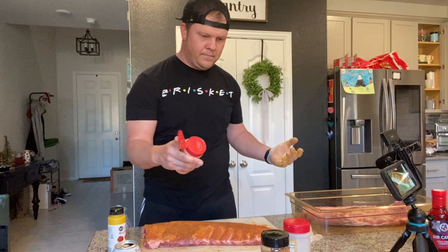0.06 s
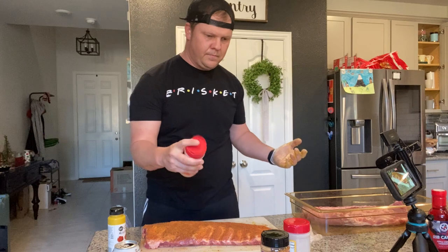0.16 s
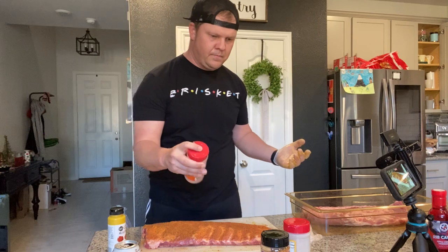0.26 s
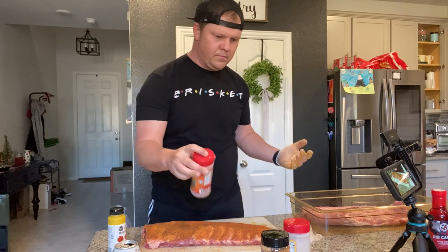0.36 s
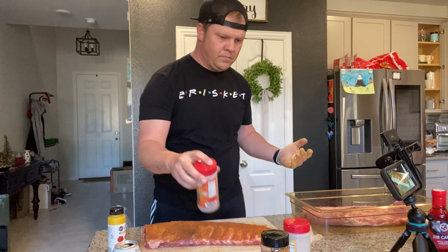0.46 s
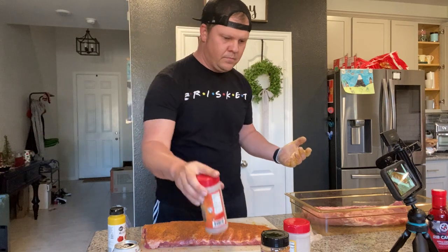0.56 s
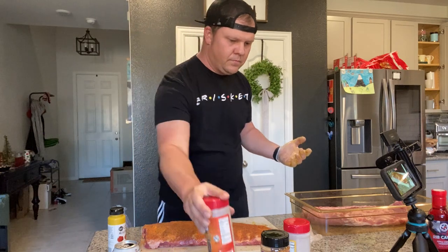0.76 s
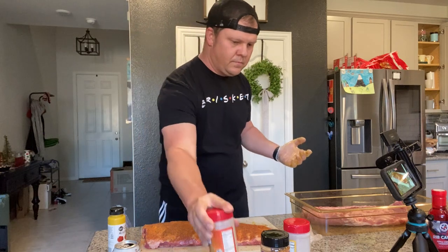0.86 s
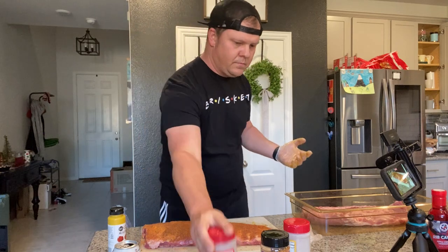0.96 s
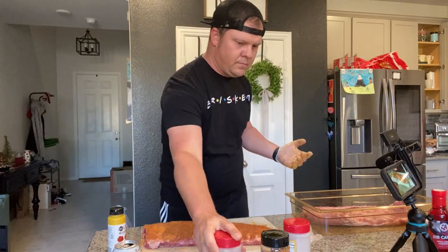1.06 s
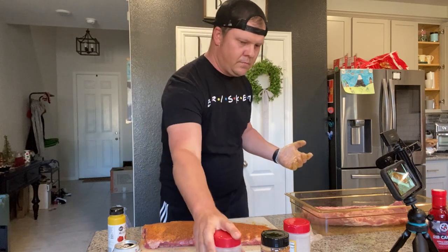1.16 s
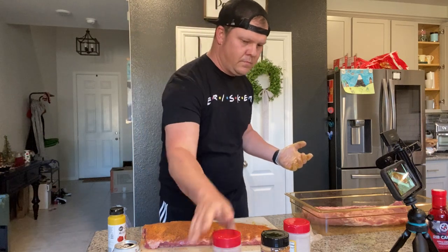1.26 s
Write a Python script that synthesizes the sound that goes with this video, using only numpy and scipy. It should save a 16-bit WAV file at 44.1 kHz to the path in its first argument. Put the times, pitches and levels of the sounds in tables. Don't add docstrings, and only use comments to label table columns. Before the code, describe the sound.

A plastic shaker lid snaps shut at about 0.2 seconds, a bright, tight click after a tiny creak. From 0.45 to 0.85 seconds the jar ticks in the hand, busiest after 0.65, with spice grains faintly sliding. At 1.02 it lands on a stone counter with a hard clack and small bounces. Short kitchen echoes, a steady low refrigerator hum and soft air; stereo phone pickup.

```python
import sys
import numpy as np
from scipy import signal
from scipy.fft import rfft, irfft, next_fast_len
from scipy.io import wavfile
from scipy.ndimage import uniform_filter1d

SR = 44100
rng = np.random.default_rng(int(sys.argv[2]) if len(sys.argv) > 2 else 0)


def boost_factor(decibels):
    exponent = np.asarray(decibels, float) / 20
    return 10 ** exponent


def inscribe(sig):
    pcm = np.round(np.clip(np.atleast_2d(sig).T, -1, 1) * 32767)
    wavfile.write(sys.argv[1], SR, pcm.astype(np.int16))


N = 57330


def evened(x):
    return x / np.sqrt(np.mean(x ** 2) + 1e-20)


def read(points, hz):
    f, value = np.transpose(points)
    return np.interp(np.log(hz + 1), np.log(f + 1), value)


def add(mix, start_s, sound):
    part = mix[round(start_s * SR):][:len(sound)]
    part += sound[:len(part)]


def late(x, samples):
    size = next_fast_len(N + 512)
    turn = np.exp(-2j * np.pi * np.fft.rfftfreq(size) * samples)
    return irfft(rfft(x, size) * turn, size)[:N]


def ring(modes, rise_s, phase):
    t = np.arange(SR // 2) / SR
    out = np.zeros(len(t))
    for (hz, db, t60), p in zip(modes, phase):
        out += boost_factor(db - 60 * t / t60) * np.sin(2 * np.pi * (hz * t + p))
    return (1 - np.exp(-t / rise_s)) * out


def blip(tones, width_s, phase):
    t = np.arange(round(14 * width_s * SR)) / SR
    u = t / width_s
    swell = u ** 2 / 4 * np.exp(2 - u)
    return swell * sum(boost_factor(db) * np.sin(2 * np.pi * (hz * t + p)) for (hz, db), p in zip(tones, phase))


def blows(rows, shell, rise_s, body_s, body, body_rise_s):
    out = np.zeros(N)
    shell_hz = np.transpose(shell)[0]
    for s, db in rows:
        phase = np.arange(len(shell)) / 2 + shell_hz * (s - rows[0][0])
        add(out, s, boost_factor(db - 11.5) * ring(shell, rise_s, phase))
    add(out, body_s, ring(body, body_rise_s, np.arange(len(body)) / 2))
    return out


def colour(x, points):
    log_gain = np.log(boost_factor(read(points, abs(np.fft.fftfreq(4096, 1 / SR)))))
    taps = np.fft.ifft(np.exp(np.conj(signal.hilbert(log_gain)))).real[:2048]
    return signal.fftconvolve(x, taps / np.linalg.norm(taps))[:N]


def cracks(rows, points):
    out, t = np.zeros(N), np.arange(400) / SR
    rise = np.minimum(t / 0.00053, 1)
    for (s, db), burst in zip(rows, rng.standard_normal((len(rows), 400))):
        add(out, s, boost_factor(db - 60 * t / 0.0077) * rise * burst)
    return colour(out, points)


def puffs(rows, points):
    out = np.zeros(N)
    for s, db in rows:
        add(out, s, boost_factor(np.array([db])))
    return colour(out, points)


# start in seconds, level in dB.
LATCH_SLIPS = [
    (.2172, -37),
    (.2184, -17.5),
    (.2194, -9.5),
    (.2202, -11),
    (.2210, -11.5),
    (.2218, -15.5),
    (.2236, -36),
    (.2265, -45),
]
# pitch in Hz, level in dB, time to fall 60 dB in seconds.
LID_MODES = [(870, -5, 0.01), (1170, 1, 0.012), (1400, -12, 0.0092), (1823, -5, 0.018), (2185, -8, 0.011),
             (2617, 0, 0.0058), (3000, -16, 0.0078), (3564, -0.5, 0.013), (4220, -1.5, 0.0051),
             (5090, 1, 0.0048), (5680, 3, 0.0041), (6450, -20, 0.0055), (9210, 9.5, 0.0061),
             (10630, 4, 0.0039)]
# pitch in Hz, level in dB, time to fall 60 dB in seconds.
JAR_MODES = [(125, -34.5, 0.11), (194, -19.5, 0.094), (272.8, -28, 0.15), (392, -26, 0.065),
             (514, -19.5, 0.033)]
# pitch in Hz, level in dB per Hz.
SNAP_CRACK = [(100, -20), (250, 3), (600, 2), (1300, -4), (2300, 2), (4200, -7), (10500, -3), (15000, -27)]


def lid_snap():
    snap = blows(LATCH_SLIPS, LID_MODES, 0.00033, .2215, JAR_MODES, 0.005)
    return snap + boost_factor(-4.5) * cracks(LATCH_SLIPS, SNAP_CRACK)


# pitch in Hz, level in dB.
LID_TAIL = [(100, -2.5), (1500, 0.5), (2200, 4.5), (3000, -3), (3600, 2.5), (4400, 0), (6000, 0.5),
            (15000, 0)]


def lid_puff():
    return boost_factor(18.5) * colour(puffs(LATCH_SLIPS[3:4], SNAP_CRACK), LID_TAIL)


def creak():
    out, t = np.zeros(N), np.arange(round(0.026 * SR)) / SR
    rub = rng.standard_normal(len(t))
    lid = ring(LID_MODES[:-3], 0.00018, rng.random(len(LID_MODES)))
    grit = np.convolve(rub, lid)[:len(t)]
    add(out, 0.2026, boost_factor(-58.5 + 960 * t) * evened(grit))
    return out


# start in seconds, knock level in dB, knock pitch in Hz,
# mid click level in dB, air click level in dB.
TICKS = [(0.446, -41, 1560, -35, -49.5), (0.585, -76, 1500, -45.5, -54.5), (.6580, -29, 1450, -25, -39),
         (.7250, -24, 1400, -34.5, -38.5), (0.7486, -63, 1500, -49, -56),
         (.7720, -15.5, 1516, -30.5, -41.5), (0.7996, -23.5, 1676, -21.5, -24),
         (.8560, -32.5, 1810, -53.5, -26.5), (1.005, -63, 1500, -49, -53), (1.237, -48, 1580, -73, -70),
         (0.6527, -37.5, 1470, -52, -70), (.5175, -77, 1500, -60.5, -72)]
# low push level in dB, push pitch in Hz, mid click centre in Hz,
# spread of the click from 0 to 1, crack level in dB.
TICK_BODY = [(-37.5, 367, 3770, 1, 0.5), (-41, 400, 3350, 0.19, 4), (-36, 290, 3660, 0.91, -0.5),
             (-38.5, 360, 3730, 1, 6), (-58, 110, 3600, 1, -2), (-33.5, 330, 4900, 0.9, 5),
             (-38.5, 270, 3330, 0.93, -3), (-64, 320, 4100, 1, 2.5), (-68, 310, 3150, 1, 8),
             (-45, 340, 4000, 1, 0), (-47, 840, 3400, 1, 0), (-75, 320, 5100, .15, -14)]
# pitch in Hz, level in dB.
AIR_TONES = [(7800, 6), (9200, 11.5), (11000, 4), (12500, -9), (14200, -20)]
# multiple of the centre pitch, level in dB.
CLICK_TONES = [(0.751, -0.5), (1.0, 2), (1.28, -4.5), (1.62, -2.5)]


def ticks():
    out, chance = np.zeros(N), rng.random((len(TICKS), 12))
    for tick, body, phase in zip(TICKS, TICK_BODY, chance):
        s, knock_db, knock_hz, click_db, air_db = tick
        push_db, push_hz, click_hz, spread, _ = body
        click = [((1 + spread * (k - 1)) * click_hz, db) for k, db in CLICK_TONES]
        click_s = 0.00025 / spread ** 0.72
        add(out, s + .0005, boost_factor(air_db - 3.5) * blip(AIR_TONES, 0.000087, phase))
        add(out, s + .0004, boost_factor(click_db - 3.5) * blip(click, click_s, phase[5:]))
        add(out, s + 0.00056, blip([(knock_hz, knock_db)], 0.00038, [0]))
        add(out, s + 0.00056, blip([(push_hz, push_db)], 0.00091, [0]))
    return out


def tick_edges():
    return [(s, .5 * (click_db + air_db) + body[-1])
            for (s, _, _, click_db, air_db), body in zip(TICKS, TICK_BODY)]


# start in seconds, pitch in Hz, level in dB, swell in seconds.
THUMPS = [
    (.2205, 334, -22.5, 0.0014),
    (.243, 253, -33, .004),
    (.28, 252, -40.5, 0.0073),
    (1.047, 219.5, -27, 0.0039),
    (1.058, 290, -33.5, 0.0071),
    (1.085, 116, -34, 0.005),
]


def thumps():
    out = np.zeros(N)
    for s, hz, db, swell_s in THUMPS:
        add(out, s, blip([(hz, db)], swell_s, [0]))
    return out


# time in seconds, level in dB.
SPICE_LEVEL = [
    (.40, -108),
    (.47, -61.5),
    (.56, -77),
    (.64, -72.5),
    (.73, -59.5),
    (.82, -55.5),
    (.90, -77),
    (1.0, -66),
    (1.1, -87),
]
# pitch in Hz, level in dB per Hz.
TICK_CRACK = [(100, -11), (500, -6), (1000, -5.5), (1800, 6.5), (4000, -1.5), (7000, -3), (11000, -6),
              (15000, -50)]


def spice():
    size = boost_factor(7.5 * np.minimum(rng.exponential(1, N), 3.2))
    sign = rng.choice([-1., 1.], N)
    hits = rng.random(N) < 2700 / SR
    level = boost_factor(np.interp(np.arange(N) / SR, *np.transpose(SPICE_LEVEL)))
    return evened(colour(size * sign * hits, TICK_CRACK)) * level


# start in seconds, level in dB.
LANDINGS = [
    (1.0218, -25),
    (1.0228, -12.5),
    (1.0238, -11.5),
    (1.0280, -24),
    (1.0330, -45),
    (1.0360, -23),
]
# pitch in Hz, level in dB, time to fall 60 dB in seconds.
BASE_MODES = [(752, -12.5, 0.046), (964, -10.5, 0.044), (1161, -1.5, 0.017), (1555, -7, 0.0062),
              (2100, -15, 0.011), (3245, -7, 0.013), (3850, -11, 0.0093), (4950, 9.5, 0.0073),
              (6850, 3, 0.0037), (9430, 7.5, 0.0052), (12200, 1, 0.0022), (14500, -22, .004)]
# pitch in Hz, level in dB, time to fall 60 dB in seconds.
SLAB_MODES = [(92, -35.5, 0.15), (113.8, -23, 0.13), (148.6, -33, 0.071), (182.6, -39, 0.27),
              (253, -33.5, 0.13), (297.7, -32.5, 0.16), (408, -18.5, 0.049), (478, -34, 0.076),
              (596, -35.5, 0.068)]
# pitch in Hz, level in dB per Hz.
LAND_CRACK = [(70, -19), (200, 2.5), (800, -2.5), (1700, -10.5), (3500, -3.5), (7000, -10.5), (11000, -17),
              (15500, -37)]


def landing():
    out = blows(LANDINGS, BASE_MODES, 0.00034, 1.0245, SLAB_MODES, 0.0044)
    add(out, 1.03, blip([(59.6, -45)], 0.029, [0]))
    return out + boost_factor(-6.0) * cracks(LANDINGS, LAND_CRACK)


# pitch in Hz, likeness from -1 to 1.
LIKENESS = [(30, 0.39), (100, 0.45), (200, 0.69), (350, 0.28), (640, 0.0014), (1400, -0.079), (3000, 0.081),
            (7000, 0.091)]


def pair_noise(frames, hz):
    a, b, c, d = rng.standard_normal((frames, len(hz), 4)).T
    same = read(LIKENESS, hz)[:, None]
    left, other = a + 1j * b, c + 1j * d
    return np.array([left, same * left + np.sqrt(1 - same ** 2) * other])


# pitch in Hz, time to fall 60 dB in seconds.
KITCHEN_T60 = [(125, 0.84), (250, 0.44), (500, 0.36), (1000, 0.72), (2000, 0.53), (4000, 0.57),
               (8000, 0.55), (13000, 0.34)]
# pitch in Hz, level in dB.
KITCHEN_TINT = [(125, 1.5), (300, -2), (700, -1.5), (1500, -2.5), (3500, -4.5), (8000, -8.5), (12700, -7),
                (14200, -18)]


def kitchen(x):
    hz, t = np.fft.rfftfreq(256, 1 / SR), np.arange(520) * 64 / SR
    slow = boost_factor(-60 * t / read(KITCHEN_T60, hz)[:, None])
    early = boost_factor(6.5 - 60 * t / 0.054)
    spectra = pair_noise(len(t), hz) * (slow + early) * boost_factor(read(KITCHEN_TINT, hz))[:, None]
    tail = signal.istft(spectra, nperseg=256, noverlap=192)[1]
    gap_s = 0.0016
    tail = tail * np.clip(np.arange(tail.shape[1]) / SR / gap_s - 1, 0, 1)
    return signal.fftconvolve(x[None], tail * boost_factor(-52.5), axes=1)[:, :N]


# pitch in Hz, level in dB rms, waver as a share of the tone.
HUM = [(61.3, -75.5, 0.073), (120.6, -46.5, 0.11), (245.8, -61.5, 0.74)]
# pitch in Hz, level in dB per Hz.
AIR_NOISE = [(25, -31), (86, -17), (300, -16.5), (700, -13.5), (1200, -30), (4000, -35), (8000, -41),
             (14000, -58)]


def fridge():
    hz, t = np.fft.rfftfreq(2048, 1 / SR), np.arange(N) / SR
    z = pair_noise(N // 512 + 5, hz)

    def noise(gain):
        return evened(signal.istft(z * gain[:, None], nperseg=2048, noverlap=1536)[1][:, :N])

    rumble = 1 / (1 + ((hz - 60) / 57) ** 2) * (hz > 15)
    out = boost_factor(-57) * noise(boost_factor(read(AIR_NOISE, hz))) + boost_factor(-60) * noise(rumble)
    for f, db, waver in HUM:
        drift = uniform_filter1d(uniform_filter1d(rng.standard_normal((2, N)), 1500), 1500)
        drift = evened(drift)
        sway = 1 + waver * (drift[0] + 1j * drift[1])
        tone = np.sqrt(2) * (sway * np.exp(2j * np.pi * f * t)).real
        out = out + boost_factor(db) * tone * boost_factor(np.array([[-.7], [.7]]))
    return out


def scene():
    edges, grains = tick_edges(), spice()
    snap = creak() + lid_snap()
    in_hand = ticks() + thumps() + grains + boost_factor(3.0) * cracks(edges, TICK_CRACK)
    hand_puff = boost_factor(21.0) * puffs(edges, TICK_CRACK) + boost_factor(6) * grains
    land_puff = boost_factor(16.5) * puffs(LANDINGS[1:2], LAND_CRACK)
    parts = [(snap, lid_puff(), 0.84),
             (in_hand, hand_puff, 1.98),
             (landing(), land_puff, 5.24)]
    out = fridge()
    for direct, puff, lag in parts:
        out = out + np.array([late(direct, lag), direct]) + kitchen(boost_factor(-9) * direct + puff)
    return out


def top_cut(x):
    return signal.sosfilt(signal.butter(12, 16650, fs=SR, output="sos"), x)


def record(dry):
    pad = 4096
    size = next_fast_len(N + 2 * pad)
    hz = np.fft.rfftfreq(size, 1 / SR)
    shared = .99 / (1 + np.exp((7200 - hz) / 120))
    padded = np.pad(dry, ((0, 0), (pad, pad)), "reflect") * signal.windows.tukey(N + 2 * pad, pad / N)
    band = np.sqrt((1 + (hz / 16200) ** 60) * (1 + (40 / (hz + 1)) ** 6))
    left, right = rfft(padded, size) / band
    port = left * np.exp(-2j * np.pi * hz * 7.1 / SR)
    right = shared * port + np.sqrt(1 - shared ** 2) * right
    mix = irfft(np.array([left, right]), size)[:, pad:pad + N]
    return top_cut(mix)


dry = scene()
out = record(dry)
inscribe(out)
```